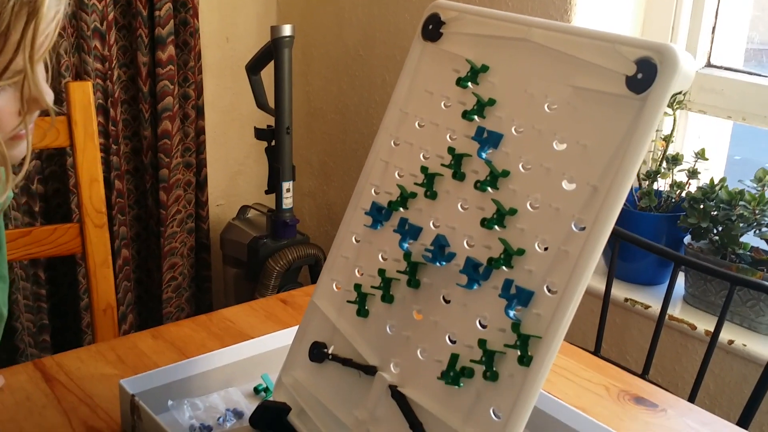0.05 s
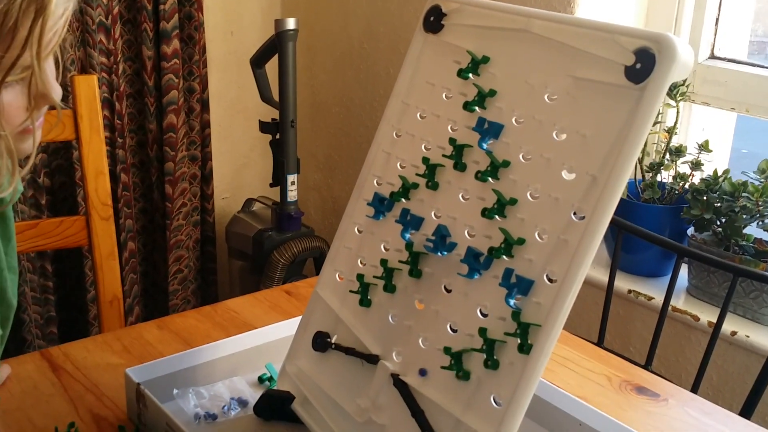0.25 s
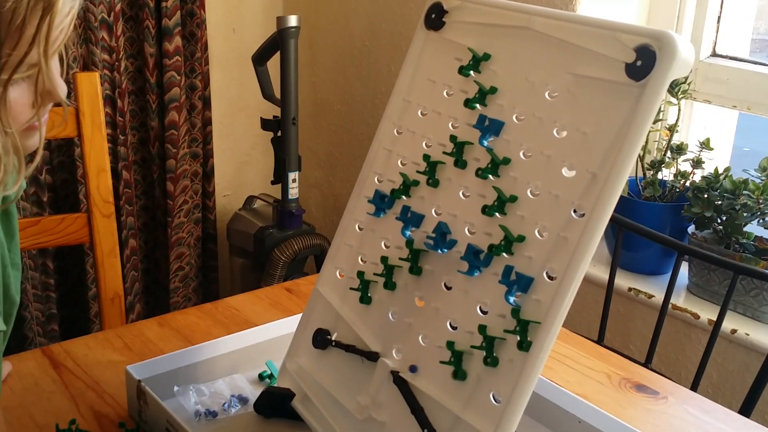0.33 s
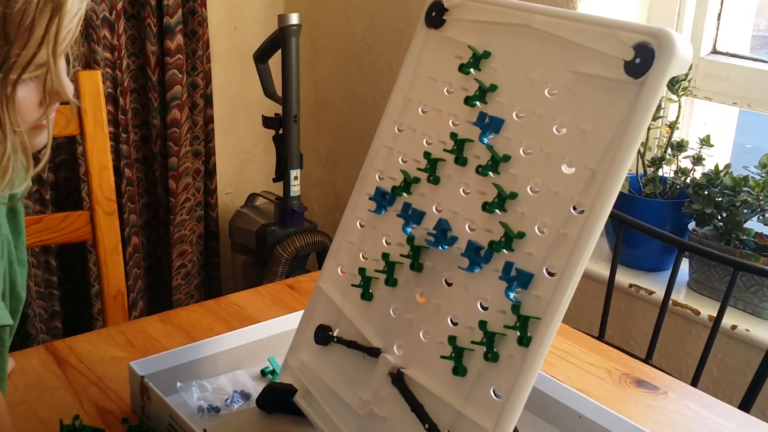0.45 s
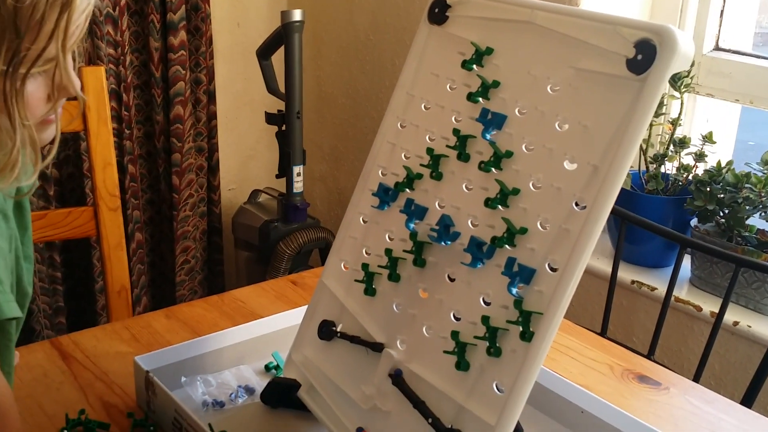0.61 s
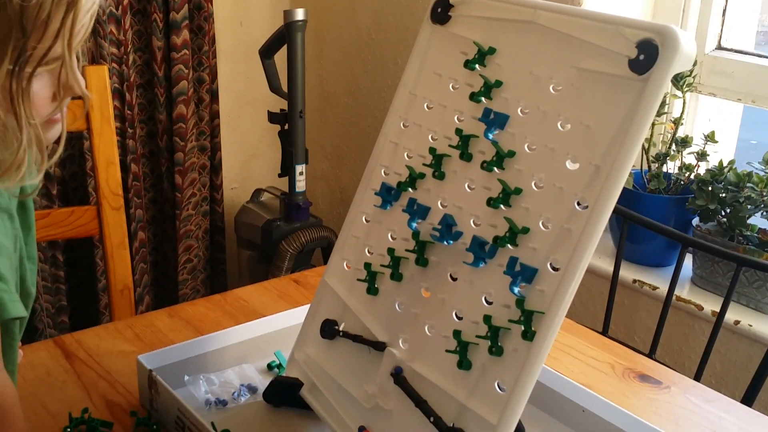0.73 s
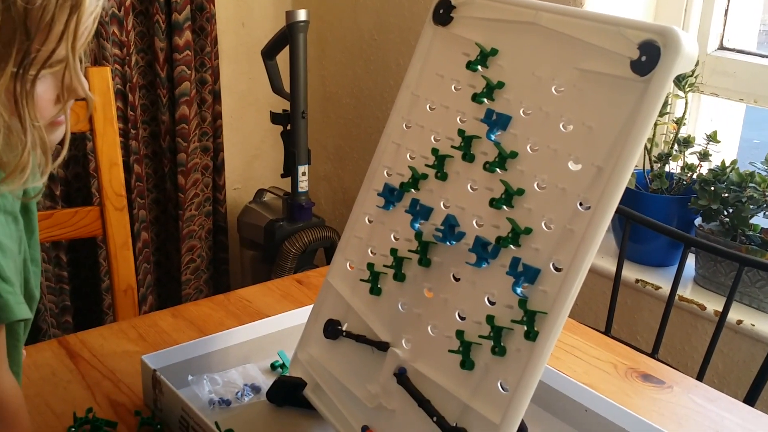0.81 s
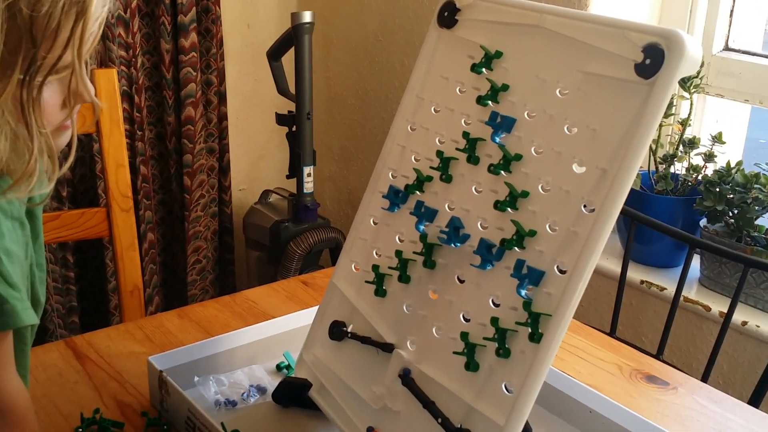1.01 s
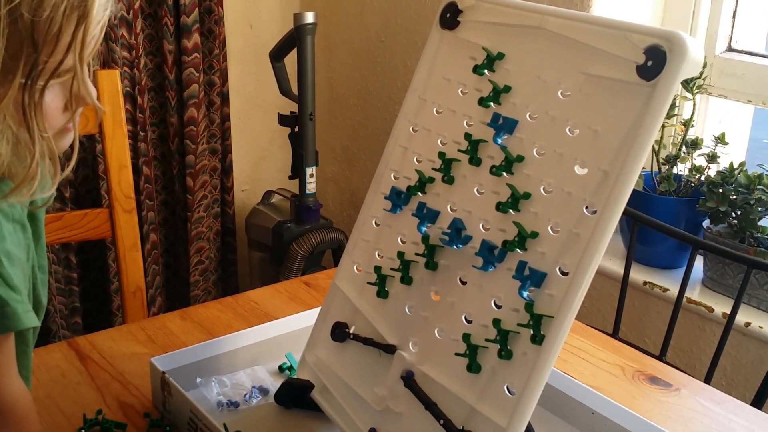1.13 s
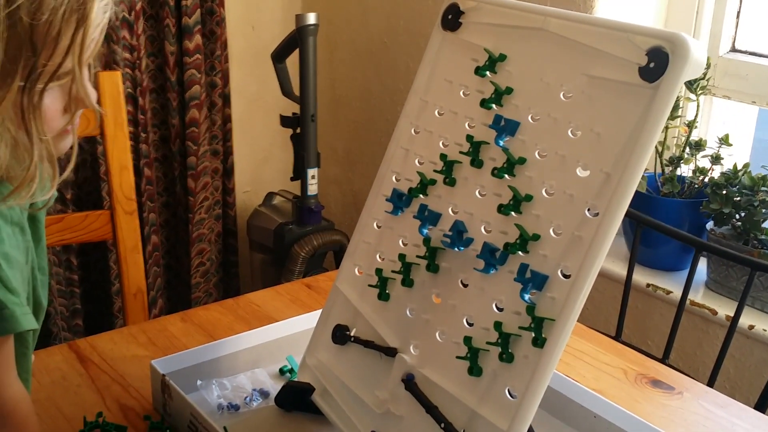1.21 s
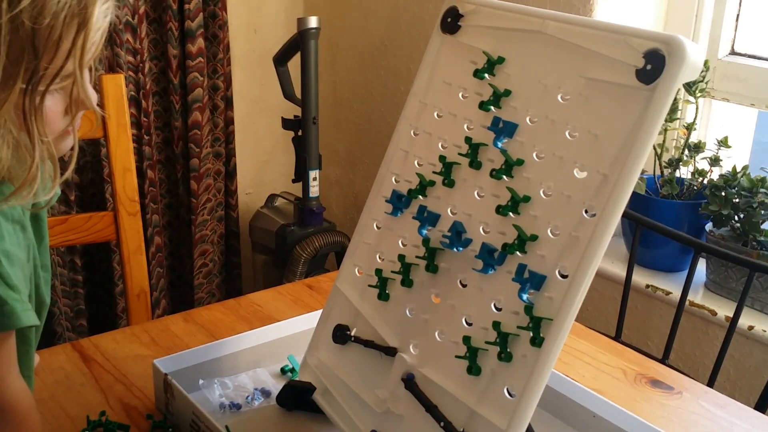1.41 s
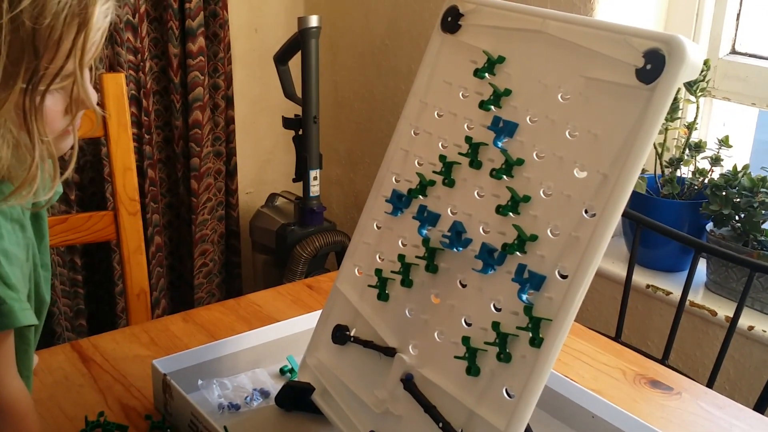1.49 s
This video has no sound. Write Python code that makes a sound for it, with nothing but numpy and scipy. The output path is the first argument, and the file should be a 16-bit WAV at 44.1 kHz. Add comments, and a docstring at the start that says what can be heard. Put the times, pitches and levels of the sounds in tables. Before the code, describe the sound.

Quick plastic clacks of a marble tumbling down a toy marble run in a quiet room.

```python
"""A marble clacks down through the plastic pieces of an upright toy board, lightly at first, then hard,
while the panel drums and rumbles under its rolling. From 0.4 s a small hard part pings and chatters,
and the marble trips a lever at the bottom, which clacks down and back. The rumble fades, a soft scuff
follows at 0.9 s, then one last faint thump. A quiet living room answers each knock."""
import sys
import numpy as np
from scipy import signal
from scipy.fft import rfft, irfft
from scipy.io import wavfile

SR = 44100
rng = np.random.default_rng(int(sys.argv[2]) if len(sys.argv) > 2 else 0)


def inscribe(sig):
    """Save sig as 16-bit PCM at rate SR to the path in sys.argv[1].

    A 1-D sig is mono; a 2-D sig holds one channel per row.
    Samples are clipped to [-1, 1] before scaling.
    """
    pcm = np.round(np.clip(np.atleast_2d(sig).T, -1, 1) * 32767)
    wavfile.write(sys.argv[1], SR, pcm.astype(np.int16))


N = 68355
SHOT = 24576   # samples in which one contact dies away
T = np.arange(N) / SR
AGE = T[:SHOT]   # seconds since a contact

# The marble's hits. Each row: start in seconds, level in dB, bass, upper mids and treble in dB,
# rebound delay in seconds, rebound level in dB, room send in dB.
MARBLE_HITS = [(0.001, -21, 13.5, 0.5, 4.5, 0.01, -1, -1), (0.0648, -20, 6, 0, 6.5, 0.0031, 3.5, 5),
               (0.083, -17, 1, -2.5, 4, 0.0031, -3, 1.5), (0.1179, -18, 6.5, -0.5, -4.5, .002, -6.5, -6),
               (0.1962, -30, 7, -5, -6.5, .004, 0.5, 3), (0.2237, 6, -0.5, 0, 0, .0018, -10, 1),
               (0.3267, 5, 0, 0, -1.5, .0032, -7.5, -1.5), (0.3924, 1.5, -3.5, -7.5, -0.5, .0035, -1.5, -5),
               (0.4492, -15, 16, 7.5, 8, .005, -5.5, 2), (0.503, -22.5, 20, -0.5, -4, .008, -3, -11.5),
               (0.599, -26.5, 10, 0, -4, 0.0059, -17, 3)]
# The bright clack of plastic. Each row: frequency in Hz, relative level in dB.
PIECE_EQ = [(60, -27), (200, -20), (450, -15), (1200, -12.5), (2400, -0.5), (3800, 4), (5800, -1.5),
            (7500, -10.5), (10000, -16), (15000, -29.5)]
# The pieces and the panel behind them ring. Each row: pitch in Hz, relative level in dB, t60 in seconds.
PIECE_RING = [(722.6, -28, 0.14), (874.7, -28, 0.14), (1173, -27.5, 0.1), (2037, -10.5, 0.041),
              (2534, 1.5, 0.031), (2815, -3, 0.022), (3037, 0.5, 0.027), (3814, 1, .018), (4538, 0, .025),
              (5700, -1.5, 0.017), (8353, -10, 0.0092)]


def marble_knocks(ring_db=-1.5, pan_db=-0.5):
    """The marble hits a plastic piece, which rebounds against its stop."""
    out, part = np.zeros((2, N)), body(PIECE_EQ, PIECE_RING)
    for start, db, bass_db, mids_db, treble_db, rebound_s, rebound_db, room_db in MARBLE_HITS:
        hit = strike(part, 0, ring_db)
        rebound = from_db(rebound_db) * delay(rebound_s) * strike(part, 0, ring_db)
        tone = colour([(900, bass_db), (2900, 0), (3800, mids_db), (6500, mids_db), (9500, treble_db)])
        knock = in_room((hit + rebound) * tone, room_db, pan_db, tail_db=-2.5, early_db=-9.5)
        add(out, start, from_db(db) * knock)
    return out


# The lever goes down and back. Each row: start in seconds, level in dB, rebound delay in seconds,
# rebound level in dB, room send in dB.
LEVER_HITS = [(0.4621, -4, .002, -2.5, -2), (0.6213, -11.5, 0.0029, -4, -2.5)]
# Its hollow clack. Each row: frequency in Hz, relative level in dB.
LEVER_EQ = [(100, -18), (500, -5.5), (1300, -9), (1900, -0.5), (3500, 1.5), (4600, 7.5), (6000, 1.5),
            (6900, -1.5), (7800, -21), (10000, -30), (15000, -25.5)]
# Its short ring. Each row: pitch in Hz, relative level in dB, t60 in seconds.
LEVER_RING = [(1924, -10, 0.029), (3140, -2, 0.043), (4560, -24, 0.032), (6310, -4.5, 0.0062)]


def lever_clacks(dry_ring_db=-3, ring_in_room_db=-13, pan_db=-2.0):
    """The tripped lever clacks twice, each time with a quick rebound; its ring is mostly dry."""
    out, part = np.zeros((2, N)), body(LEVER_EQ, LEVER_RING)
    _, ringing = part
    for start, db, rebound_s, rebound_db, room_db in LEVER_HITS:
        rebound = from_db(rebound_db) * delay(rebound_s)
        contacts = strike(part, 0, ring_in_room_db) + rebound * strike(part, 0, ring_in_room_db)
        dry_ring = from_db(dry_ring_db) * irfft(ringing * (1 + rebound)) * panned(pan_db)
        # near the table top, early echoes outweigh the tail
        clack = in_room(contacts, room_db, pan_db, tail_db=-5.5, early_db=-1.5)
        add(out, start, from_db(db) * (clack + dry_ring))
    return out


# The small part chatters. Each row: start in seconds, level in dB, tick level in dB, room send in dB.
PING_HITS = [(0.3932, -8.5, -13, 5), (0.4927, 4, -10.5, -3.5), (0.5032, -8.5, -10, -6.5),
             (0.5195, -11.5, -11, 0), (0.5996, -21, -39, -15)]
# Its sharp tick. Each row: frequency in Hz, relative level in dB.
TICK_EQ = [(100, -10), (700, -4), (2500, -12.5), (5200, 8), (7200, 5.5), (10000, -19), (15000, -20)]
# Its high ring. Each row: pitch in Hz, relative level in dB, t60 in seconds.
PING_RING = [(5234, 1.5, 0.057), (5480, -6, .04), (7060, -8, 0.034), (9560, -27, 0.0094),
             (11900, -18, 0.01)]


def small_part_pings(pan_db=4.0):
    """A small hard part gives a tick and a short bright ring at every touch."""
    out, part = np.zeros((2, N)), body(TICK_EQ, PING_RING)
    for start, db, tick_db, room_db in PING_HITS:
        ping = in_room(strike(part, tick_db, 0), room_db, pan_db, tail_db=-7, early_db=1)
        add(out, start, from_db(db) * ping)
    return out


# Thumps on the panel. Each row: start in seconds, gain in dB.
PANEL_HITS = [(0.03, -4.5), (0.114, -4), (0.328, 3.5), (0.493, 7.5), (0.622, -4.5), (1.165, -15)]
# The panel's low boom. Each row: pitch in Hz, level in dB before a thump's gain, t60 in seconds.
PANEL_RING = [(87, -64.5, 0.93), (147.8, -55, 0.48), (276, -69, .5), (403, -58, 0.13), (721, -61.5, .2),
              (850, -54.5, 0.081)]
# The fader on the rolling marble. Each row: time in seconds, level in dB.
ROLL_FADER = [(0, -48), (.17, -57.5), (.3, -50), (.51, -52.5), (.57, -57.5), (.7, -64.5), (.85, -73.5),
              (1.55, -86)]
# Its bassy rumble. Each row: frequency in Hz, relative level in dB.
ROLL_EQ = [(25, -15), (55, -9.5), (100, 3.5), (250, -7), (700, -9), (1500, -5), (4000, -20), (12000, -31)]


def board_rumble(pan_db=-1.5):
    """The panel rumbles under the rolling marble and drums in its low modes."""
    out = from_db(np.interp(T, *np.transpose(ROLL_FADER))) * noise(ROLL_EQ)
    drum = ring(PANEL_RING)
    for start, db in PANEL_HITS:
        add(out, start, from_db(db) * drum)
    return out * panned(pan_db)


# A dull brush with a low bump. Each row: frequency in Hz, relative level in dB.
SCUFF_EQ = [(80, -13), (143, 13), (200, -3), (800, -3), (1000, 3), (1200, -3), (1650, -9), (1900, -3),
            (2400, -0.5), (2700, -8.5), (3100, -4.5), (3800, -12), (5800, -15), (7500, -33), (15000, -25)]


def scuff(peak_s=0.907, width_s=0.029, level_db=-56.5):
    """One soft scuff: noise that swells and falls away."""
    swell = np.exp(-.5 * ((T - peak_s) / width_s) ** 2)
    return from_db(level_db) * swell * noise(SCUFF_EQ)


# The living room's reverb tail. Each row: band centre in Hz, relative level in dB, t60 in seconds.
REVERB_BANDS = [(150, 0.5, 0.496), (610, 10.5, 0.27), (2550, -1.5, .29), (4980, 0.5, 0.22),
                (12000, -1, 0.26)]


def in_room(spectrum, room_db, pan_db, tail_db, early_db, predelay_s=0.0047, build_s=0.004):
    """Direct sound, early echoes off the table top and walls, and a tail; each spot has its own echoes."""
    hz, white = np.fft.rfftfreq(SHOT, 1 / SR), diffuse(SHOT)
    onset = np.clip((AGE - predelay_s) / build_s, 0, 1)
    tail = 0
    for centre, db, t60 in REVERB_BANDS:
        band = at_hz([(row[0], row[0] == centre) for row in REVERB_BANDS], hz)   # 1 here, 0 at the rest
        tail += from_db(db) * dying(t60) * irfft(white * band)
    early = irfft(diffuse(SHOT)) * dying(t60=0.085)
    echoes = from_db(tail_db) * unit(tail * onset) + from_db(early_db) * unit(early * onset)
    wet = from_db(room_db) * rfft(echoes) * panned(pan_db=-4.5)
    return irfft(spectrum * (panned(pan_db) + wet))


# The low bed of the quiet room. Each row: frequency in Hz, relative level in dB.
ROOM_TONE_EQ = [(25, -21.5), (55, -10.5), (100, -4), (140, -2.5), (180, -12.5), (260, -2), (340, -21),
                (420, -9), (520, -18.5), (1000, -15), (2000, -22), (4000, -27), (8000, -36), (15000, -31.5)]


def room_tone(level_db=-66):
    """Faint steady noise under everything."""
    return from_db(level_db) * noise(ROOM_TONE_EQ)


# Stereo image of diffuse sound. Each row: frequency in Hz, left-right likeness from 0 (wide) to 1 (mono).
STEREO_LIKENESS = [(100, 0.7), (500, 1), (1000, .5), (2000, 0), (5000, .05), (15000, 0)]


def diffuse(size):
    """Spectrum of stereo white noise, alike in the bass and unrelated in the treble."""
    hz = np.fft.rfftfreq(size, 1 / SR)
    mid, side = rng.standard_normal((2, len(hz))) + 1j * rng.standard_normal((2, len(hz)))
    alike = np.clip(at_hz(STEREO_LIKENESS, hz), 0, 1)
    return np.sqrt(1 + alike) * mid + np.sqrt(1 - alike) * side * [[1], [-1]]


def noise(eq):
    """Coloured diffuse noise of rms 1."""
    x = irfft(diffuse(N) * from_db(at_hz(eq, np.fft.rfftfreq(N, 1 / SR))), N)
    return x / x.std()


def strike(part, knock_db, ring_db, click_db=-7, shudder_db=1.5, left_lead_s=.00007):
    """Spectrum of one contact: a click, a brief dense shudder and the ring of the part."""
    knock, ringing = part
    shudder = from_db(shudder_db) * rfft(unit(irfft(diffuse(SHOT)) * dying(t60=0.038)))
    impulse = np.array([delay(0), delay(left_lead_s)])
    click = from_db(click_db) * impulse
    return from_db(knock_db) * knock * (click + shudder) + from_db(ring_db) * ringing * impulse


def body(eq, modes):
    """Spectra of a part's broad knock and of its ring, each of energy 1."""
    return rfft(unit(irfft(colour(eq)))), rfft(unit(ring(modes)))


def ring(modes):
    """Decaying sines of alternating sign, set off by one touch."""
    return sum((-1) ** k * from_db(db) * np.sin(2 * np.pi * hz * AGE) * dying(t60)
               for k, (hz, db, t60) in enumerate(modes))


def colour(eq):
    """Causal (minimum-phase) frequency response that follows an EQ curve."""
    gain = from_db(at_hz(eq, np.fft.rfftfreq(SHOT, 1 / SR)))
    cepstrum = irfft(np.log(gain))[:SHOT // 2]
    cepstrum[1:] *= 2
    return np.exp(rfft(cepstrum, SHOT))


def at_hz(points, hz):
    """Read a table on a log-frequency axis."""
    freqs, values = np.transpose(points)
    return np.interp(np.log(np.maximum(hz, 1)), np.log(freqs), values)


def dying(t60):
    """Exponential decay from 1, down 60 dB after t60 seconds."""
    return np.exp(-np.log(1000) * AGE / t60)


def delay(seconds):
    """Frequency response of a delay."""
    return np.exp(-2j * np.pi * np.arange(SHOT // 2 + 1) * np.round(seconds * SR) / SHOT)


def unit(x):
    """Scale to energy 1 per channel."""
    return x / np.sqrt(np.sum(x ** 2, axis=-1, keepdims=True))


def from_db(db):
    """Decibels to gain."""
    return 10 ** (np.asarray(db) / 20)


def panned(pan_db):
    """Left and right gains; positive leans left."""
    return from_db([[pan_db / 2], [-pan_db / 2]])


def add(out, start_s, sound):
    """Mix a sound in at its time."""
    start = int(max(start_s, 0) * SR)
    out[:, start:start + sound.shape[-1]] += sound[..., :N - start]


def scene():
    """The toy in front; the scuff and room tone behind it, a little to the right."""
    toy = marble_knocks() + lever_clacks() + small_part_pings() + board_rumble()
    return toy + (scuff() + room_tone()) * panned(pan_db=-3.0)


def record(dry):
    """A steep low-pass cuts the very top."""
    cutoff_hz = 15800
    return signal.sosfilt(signal.ellip(10, .2, 70, cutoff_hz, fs=SR, output="sos"), dry)


dry = scene()
out = record(dry)
inscribe(out)
```